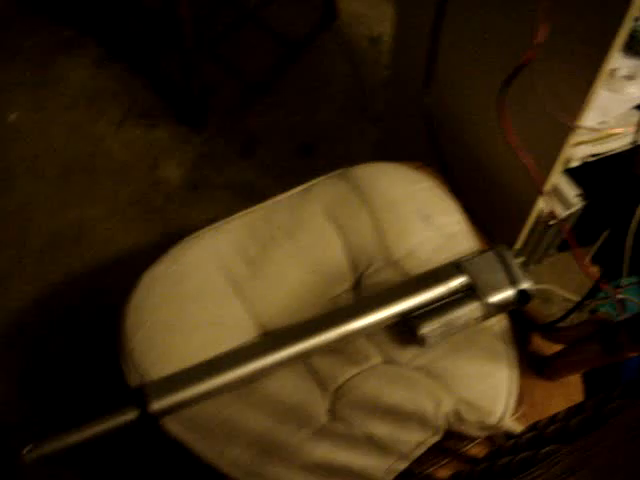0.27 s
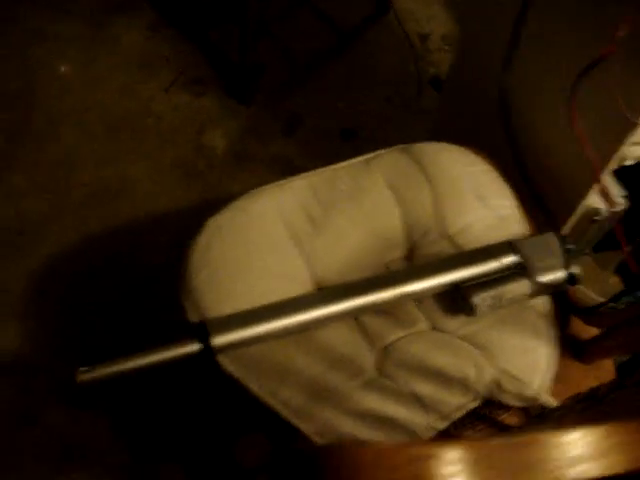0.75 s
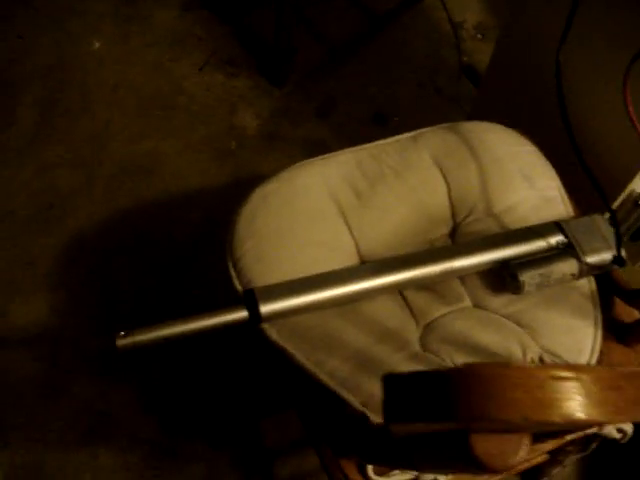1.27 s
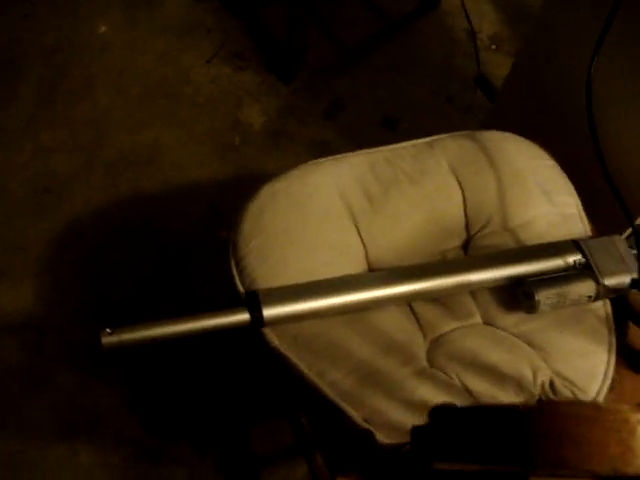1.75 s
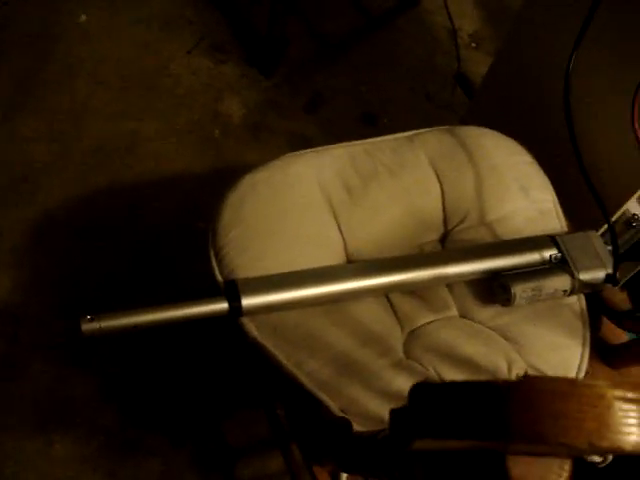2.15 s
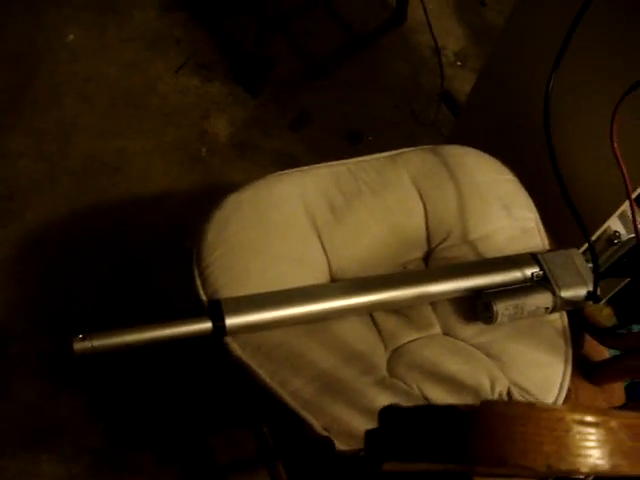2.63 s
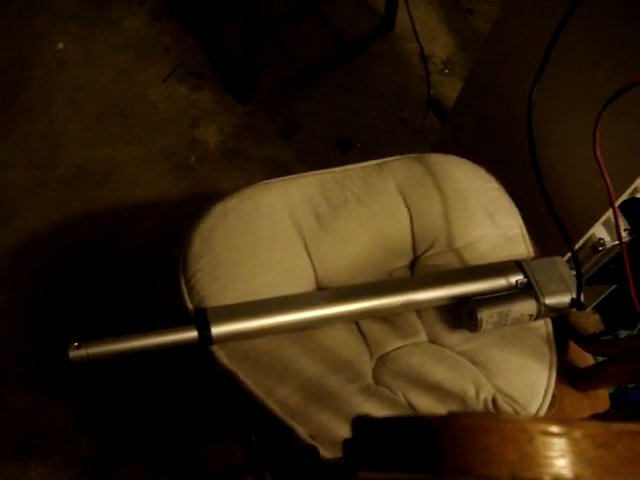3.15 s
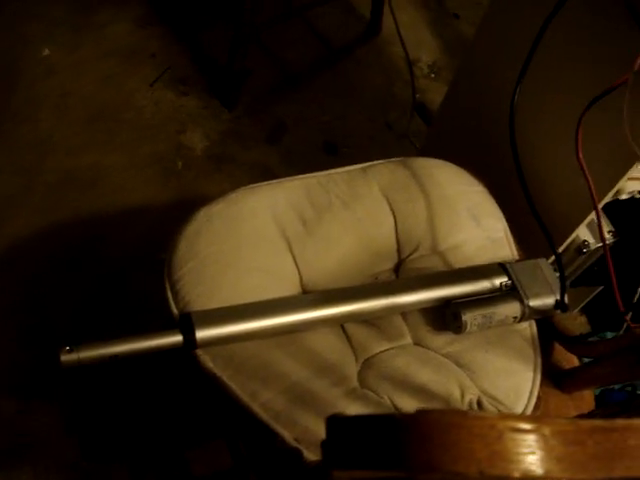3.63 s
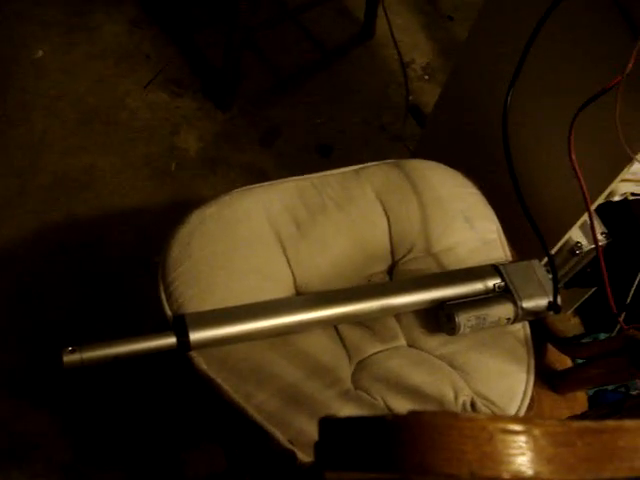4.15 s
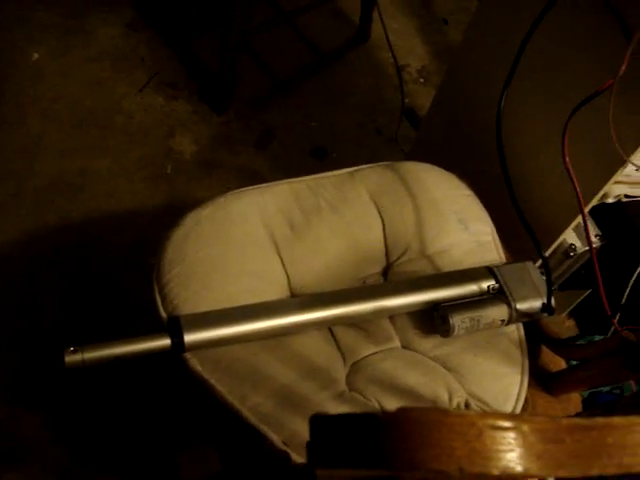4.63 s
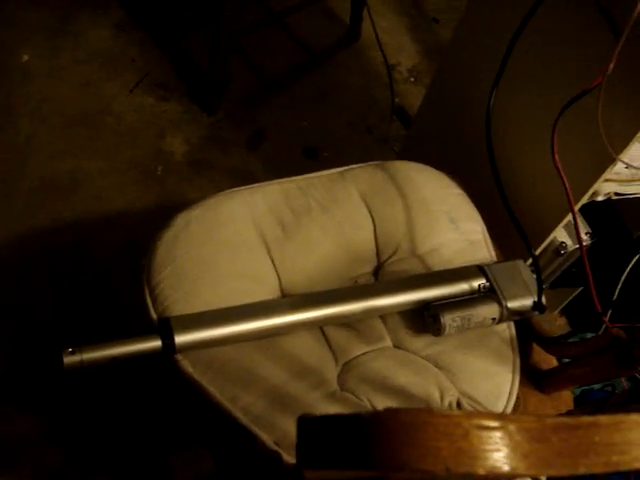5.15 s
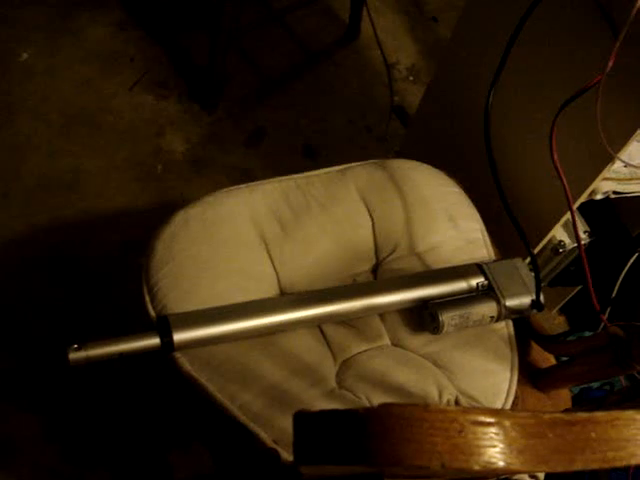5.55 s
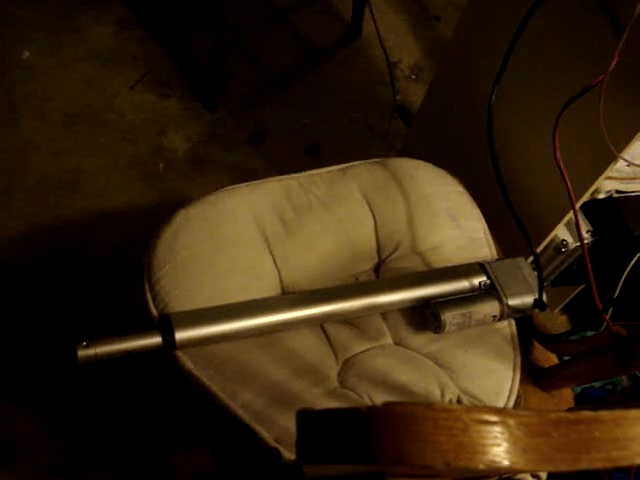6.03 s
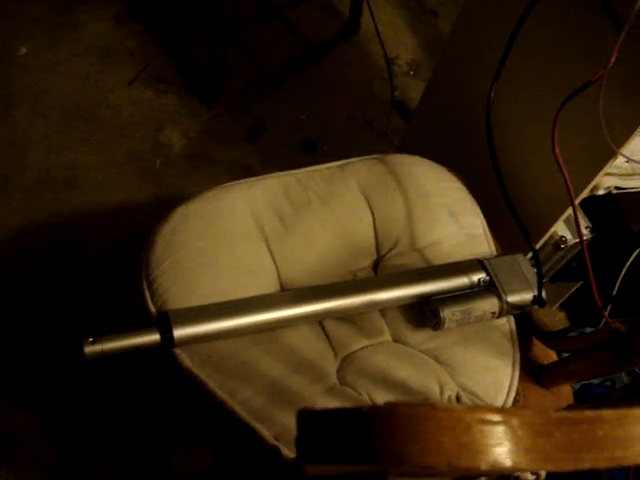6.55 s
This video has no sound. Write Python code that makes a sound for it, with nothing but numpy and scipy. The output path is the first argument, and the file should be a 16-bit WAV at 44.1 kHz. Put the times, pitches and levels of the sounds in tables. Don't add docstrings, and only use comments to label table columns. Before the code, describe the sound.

A small electric motor drives a metal linear actuator lying on a cushion in a quiet indoor room. Its raspy, whining whir is already running, shifting in tone as the handheld microphone swings toward it. At about two seconds a sharp double click interrupts it for an instant; the whir resumes rougher and slightly faster, then holds steady. Faint ticks come near the end.

```python
import sys
import numpy as np
from scipy import signal
from scipy.fft import rfft, irfft, next_fast_len
from scipy.io import wavfile
from scipy.ndimage import uniform_filter1d, map_coordinates

SR = 44100
rng = np.random.default_rng(int(sys.argv[2]) if len(sys.argv) > 2 else 0)


def wav_out(sig):
    wavfile.write(sys.argv[1], SR, np.round(np.clip(np.atleast_2d(sig).T, -1, 1) * 32767).astype(np.int16))


def field_ratio(decibels):
    return 10 ** (np.asarray(decibels, dtype=float) / 20)


N = 299468

GEAR_RATIO = 5
WHEEL_POINTS = 5 * 2048
CHANGE_S = 1.957
TURN_S, TURN_LENGTH_S = 0.4, 0.1
SEAT_S, OPEN_S = 0.54, 0.012
BRAKE_S, BRAKE_LENGTH_S, BRAKE_DB = 1.99, 0.017, -11.5

# (time [s], speed [turns/s])
SHAFT_SPEED = [(0, 50.115), (.6, 50.11), (1.35, 50.16), (1.7, 50.125), (1.93, 50.11), (1.99, 49.705),
               (2.07, 50.475), (2.12, 50.56), (2.35, 50.635), (2.5, 50.655), (3.6, 50.65), (4.1, 50.675),
               (5.7, 50.675), (6.2, 50.655), (6.79, 50.65)]
# (multiple of shaft speed, level [dB rms])
ORDERS_BEFORE = [(16.0, -64.3), (24.0, -59.3), (30.0, -64.7), (33.0, -64.1), (34.0, -59.3), (36.0, -57.9),
                 (37.0, -60.2), (48.0, -47.4), (50.0, -62.0), (51.0, -61.4), (52.0, -61.7), (54.0, -58.4),
                 (55.0, -58.6), (59.6, -58.5), (60.0, -48.4), (62.4, -61.2), (69.0, -62.6), (72.0, -63.6),
                 (78.0, -62.7), (94.0, -59.1), (97.0, -59.3), (98.0, -59.4), (100.0, -59.3), (112.0, -53.6),
                 (113.0, -52.9), (120.0, -60.4), (168.0, -62.1)]
ORDERS_AFTER = [(12.0, -57.4), (13.2, -61.0), (16.0, -62.0), (24.0, -60.6), (27.0, -62.7), (32.0, -57.7),
                (32.8, -63.8), (35.0, -61.8), (36.0, -54.9), (37.2, -65.1), (38.0, -66.1), (42.0, -67.0),
                (45.8, -67.3), (46.0, -63.5), (48.0, -53.7), (49.0, -63.9), (52.0, -59.1), (52.2, -62.3),
                (54.0, -57.6), (55.0, -59.0), (56.0, -57.5), (59.0, -61.0), (64.0, -63.9), (67.0, -61.4),
                (72.0, -55.3), (84.0, -63.7), (89.2, -61.5), (96.0, -57.6), (109.0, -62.7), (112.0, -58.3),
                (11.8, -68), (12.8, -67), (13.0, -66.5), (13.6, -69)]
# (frequency [Hz], density [dB per Hz])
RUB_BEFORE = [(180, -52), (300, -16), (801, -11.5), (1120, -13), (1190, -16.5), (1300, -13), (1820, -9.5),
              (2170, -15.5), (2340, -10.5), (2550, -8.5), (3000, -4.5), (3680, -11), (5470, -3),
              (6820, -10.5), (9980, -8.5), (13000, -47), (22000, -120)]
RUB_AFTER = [(180, -49), (300, -11.5), (539, -8.5), (606, -3), (734, -8), (1120, -8.5), (1190, -9.5),
             (1820, -3.5), (2200, -8.5), (2750, -0.5), (3180, -0.5), (3520, -3.5), (3960, -3.5),
             (5630, -3.5), (9980, -8), (13000, -47), (22000, -120)]
# (frequency [Hz], width [Hz], gain [dB])
HOUSING_BEFORE = [(1910, 130, 2.5), (2600, 200, 2), (2910, 150, 5.5), (5730, 180, 4.5), (7430, 340, 5),
                  (8860, 510, 4)]
HOUSING_AFTER = [(662, 96, 5), (1550, 300, 2.5), (2360, 120, -11), (2680, 160, 3.5), (2880, 140, 3),
                 (3195, 180, -5.5), (3970, 220, -2.5), (3450, 69, 3.5), (4740, 570, 4), (5580, 530, 5.5),
                 (6280, 300, 2.5), (6700, 200, 0.5), (7330, 550, 8), (8100, 330, -3.5), (8300, 470, 4.5),
                 (9370, 1200, 6.5)]
# (frequency [Hz], each shaft turn [dB], each wheel turn [dB])
REPEAT_BEFORE = [(500, -6, -10), (2500, -5, -4), (5000, -12, -6.5), (7000, -18, -4), (10000, -12.5, -5)]
REPEAT_AFTER = [(500, -3, -2), (1500, 0, 2), (3500, -1, 2), (4500, -3, 0), (5500, -8, -5), (6500, -12, -10),
                (10000, -13, -13)]
MESH_ORDERS = (12, 13, 36, 48, 60, 96, 97, 112, 113)
# (before click [dB rms], seated [dB rms], extra while seating [dB], seating time [s])
MESH_LEVELS = [(-65.5, -58, 0, .12), (-73, -66.5, -17, 1.8), (-55, -56, 3.5, 1.8), (-52, -55.5, 5.5, 1.5),
               (-50.8, -68.5, -8, 1.2), (-65, -56.5, -17, 0.35), (-67, -73, -3, .3), (-61, -54.5, -14, 0.2),
               (-68, -65.5, 1, .3)]
# (time [s], length [s], gain [dB])
MESH_BEAMS = [
    [(0.21, 0.15, -2.5)],
    [],
    [(0.5, 0.059, 0), (.8, .22, -8.5)],
    [(.0, 0.043, 5.5), (1.18, 0.28, 7.5), (2.5, 0.12, 1)],
    [(.1, 0.17, 3.5), (.52, 0.15, 6), (1.4, 0.13, 2.5)],
    [],
    [(0.45, 0.22, 11)],
    [(.78, .26, 13.5), (0.5, .06, 0.5)],
    [(.95, 0.61, 8)],
]
# (offset [shaft orders], level [dB])
RUNOUT_BUZZ = [(-2, -5), (-1, -6), (1, -12), (2, -8)]
SPLIT_HZ = [1600, 3380, 6750]
# (start [dB], gain on facing [dB], drift as camera backs off [dB/s])
FACING = [(-1, 1.7, -0.6), (-1.5, -.5, 1.35), (0.5, 4, -2.5), (-4, 7.5, -2)]
# (seated [dB], extra while seating [dB], change while contacts open [dB])
SEATING = [(0.03, -1.5, -2), (0.4, 1, -7), (1.94, -4, -5), (1.7, -4.5, -10)]
# (time [s], length [s], frequency [Hz], gain [dB])
SWING = [(0.074, .17, 1200, 6.5), (0.21, 0.21, 4700, -8), (0.22, 0.16, 8650, 7), (0.33, 0.27, 4200, 6),
         (0.43, 0.23, 2980, 4), (.8, 0.23, 5620, 2.5), (1.05, .1, 4800, 2.5), (1, 0.29, 6900, -5.5),
         (1.06, 0.23, 9200, -5), (2.6, 0.54, 690, -2.5), (2.6, .35, 1800, -2.5), (2.02, .08, 1000, 6),
         (.55, .3, 9800, 1.5), (1.1, .35, 3300, -2), (1.57, 0.11, 1700, 2), (.1, .15, 1430, 7),
         (2.056, 0.098, 5830, 4), (6.1, 0.7, 4300, 1.5)]
# (time [s], peak [dB], ring [Hz], t60 [s])
CLICKS = [
    (1.9557, -30, 4200, .006),
    (1.9560, -38, 950, .02),
    (1.9570, -30.5, 1420, .022),
    (1.9525, -39, 700, .02),
    (1.9600, -35, 1750, .012),
    (1.9716, -27.5, 1450, .012),
    (1.9735, -37, 640, .025),
    (1.9765, -42, 330, .04),
    (1.9732, -32, 1250, .015),
    (2.1072, -28.5, 3000, .003),
]
# (time [s], peak [dB], ring [Hz], t60 [s])
KNOCKS = [
    (.352, -46, 560, .04),
    (.365, -46.5, 244, 0.074),
    (0.376, -46, 420, .07),
    (1.056, -48, 318, 0.048),
    (1.065, -46, 440, 0.05),
    (5.992, -35.5, 3450, .03),
    (6.093, -43, 3450, .03),
    (6.19, -40, 3450, .03),
    (6.338, -38, 3450, .02),
    (6.246, -38, 4600, .02),
]
# (frequency [Hz], density [dB per Hz])
ROOM = [(12, -49), (20, -17), (65, -10.5), (92, 1), (111, -3.5), (128, -7.5), (187, -5), (296, -2.5),
        (372, -9), (449, -0.5), (500, -9.5), (650, -38), (1100, -120)]
# (start [s], end [s], lower edge [Hz])
DROPOUTS = [
    (1.958, 1.977, 9100),
    (4.64, 4.665, 9600),
    (4.707, 4.718, 9600),
]


def unit(x):
    return x / np.sqrt(np.mean(x ** 2) + 1e-20)


def along(points, hz, column=1):
    table = np.transpose(points)
    return np.interp(np.log(hz + 1), np.log(table[0] + 1), table[column])


def wobble(rate_hz):
    coarse = np.arange(0, N + 64, 64)
    knots = rng.standard_normal(int(N * rate_hz / SR) + 4)
    return np.interp(np.arange(N), coarse, map_coordinates(knots, [coarse * rate_hz / SR]))


def bump(t, at, length):
    return np.exp(-.5 * ((t - at) / length) ** 2)


def filtered(x, response):
    size = next_fast_len(N + SR // 2)
    return irfft(rfft(x, size) * response(np.fft.rfftfreq(size, 1 / SR)), size)[..., :N]


def actuator():
    t = np.arange(N) / SR
    since_s = np.maximum(t - CHANGE_S, 0)
    late = np.clip((t - CHANGE_S) / 0.0087, 0, 1)
    turns = np.cumsum(np.interp(t, *np.transpose(SHAFT_SPEED))) / SR
    before = stroke(turns, ORDERS_BEFORE, RUB_BEFORE, HOUSING_BEFORE, REPEAT_BEFORE,
                    rub_db=-40.0, drift=0.51, sway_db=2)
    after = stroke(turns, ORDERS_AFTER, RUB_AFTER, HOUSING_AFTER, REPEAT_AFTER,
                   rub_db=-45.0, drift=.22, sway_db=1.5)
    facing = (1 + np.tanh((t - TURN_S) / (2 * TURN_LENGTH_S))) / 2
    early_db = [start + gain * facing + slope * np.minimum(t, 2) for start, gain, slope in FACING]
    seating, opening = np.exp(-since_s / SEAT_S), np.exp(-(since_s / OPEN_S) ** 2)
    late_db = [seated + extra * seating + lost * opening for seated, extra, lost in SEATING]
    sound = (1 - late) * heard_from_camera(before, early_db, turns, beat=[.24, .3, .12])
    sound += late * heard_from_camera(after, late_db, turns, beat=[.1, .08, .15])
    return reflections(sound) + mesh_tones(turns, t, late)


def stroke(turns, orders, rub, housing, repeat, rub_db, drift, sway_db):
    def colour(hz):
        rings_db = sum(db / (1 + (2 * (hz - centre) / width) ** 2) for centre, width, db in housing)
        return field_ratio(along(rub, hz) + rings_db)

    hiss = filtered(rng.standard_normal(N), colour)
    fifths = np.round(np.transpose(orders)[0] * GEAR_RATIO) / GEAR_RATIO
    taken = np.concatenate([fifths, MESH_ORDERS, [60 + k for k, _ in RUNOUT_BUZZ]])
    repeating = 0
    for column, count in ((1, 1), (2, GEAR_RATIO)):
        worn = worn_pattern(turns, count, drift, taken)
        repeating += filtered(worn, lambda hz: colour(hz) * field_ratio(along(repeat, hz, column)))
    repeating /= np.sqrt(SR / 2 / 10600)
    tones = 0
    for order, (_, db) in zip(fifths, orders):
        if order not in MESH_ORDERS:
            partial = field_ratio(db + sway_db * wobble(2.5)) * tone(turns, order, flutter_rad=.15)
            if order == 13.2:
                partial *= screw_beat(turns, depth=0.31, angle_turns=0.56)
            tones += partial
    rubbing = np.array([field_ratio(-0.18) * hiss, field_ratio(1.07) * repeating])
    return field_ratio(rub_db) / np.std(hiss) * rubbing, tones


def worn_pattern(turns, count, drift, orders):
    size = WHEEL_POINTS * count // GEAR_RATIO
    lines = rfft(rng.standard_normal((2, size)))
    lines /= (abs(lines) + 1e-9) ** (.5 / count)
    lines[:, 210 * count:] = 0
    own = orders[orders * count % 1 < 1e-6]
    lines[:, np.round(own * count).astype(int)] = 0
    place = [turns / count % 1 * size]
    one, other = (unit(map_coordinates(p, place, order=1, mode="grid-wrap")) for p in irfft(lines, size))
    blend = drift * wobble(1.512)
    return np.cos(blend) * one + np.sin(blend) * other


def tone(turns, order, flutter_rad, sidebands=()):
    phase = 2 * np.pi * (order * turns + rng.random()) + flutter_rad * wobble(9.1)
    wave = np.sin(phase)
    for k, db in sidebands:
        sign = -1 if k == 1 else 1
        wave += sign * field_ratio(db) * np.sin(phase + 2 * np.pi * k * turns)
    return np.sqrt(2) * wave


def screw_beat(turns, depth, angle_turns):
    return 1 + depth * np.cos(2 * np.pi * (turns / 10 - angle_turns))


def mesh_tones(turns, t, late):
    since_s = np.maximum(t - CHANGE_S, 0)
    tones = []
    for order, levels, beams in zip(MESH_ORDERS, MESH_LEVELS, MESH_BEAMS):
        before_db, seated_db, extra_db, seat_s = levels
        db = (1 - late) * before_db + late * (seated_db + extra_db * np.exp(-since_s / seat_s))
        db += sum(beam_db * bump(t, s, length) for s, length, beam_db in beams)
        db += BRAKE_DB * bump(t, BRAKE_S, BRAKE_LENGTH_S)
        sidebands = RUNOUT_BUZZ if order == 60 else ()
        tones.append(field_ratio(db + .8 + .7 * wobble(6)) * tone(turns, order, .002 * order, sidebands))
    tones[0] *= screw_beat(turns, depth=0.17, angle_turns=0.48)
    return sum(tones)


def heard_from_camera(layers, part_db, turns, beat):
    (hiss, repeating), tones = layers
    pair = np.array([hiss, repeating + tones])
    lows = [filtered(pair, lambda hz: 1 / (1 + (hz / split) ** 16)) for split in SPLIT_HZ]
    edges = [0, *lows, pair]
    shared = field_ratio(.45 * wobble(70))
    out = 0
    for k, db in enumerate(part_db):
        steady, periodic = edges[k + 1] - edges[k]
        gain = field_ratio(db + .5 * wobble(5.7)) * (shared if k else 1)
        out += gain * (steady * throb(turns, beat) + periodic)
    return out


def throb(turns, beat):
    angle = 2 * np.pi * (np.outer([1, 2, 2 / GEAR_RATIO], turns) + rng.random((3, 1)))
    return (1 + np.dot(beat, np.cos(angle))) * field_ratio(0.39 * wobble(25))


def reflections(x):
    hz, t, z = signal.stft(x, SR, nperseg=512)
    field_db = 0
    for s, length, centre, db in SWING:
        field_db += db * np.outer(bump(hz, centre, 0.052 * centre), bump(t, s, length))
    return signal.istft(z * field_ratio(field_db), SR, nperseg=512)[1][:N]


def clicks():
    out, t = np.zeros(N + SR), np.arange(SR // 10) / SR
    for s, db, hz, t60 in [*KNOCKS, *CLICKS]:
        onset = 1 - np.exp(-t * hz * 4)
        ring = np.sin(2 * np.pi * hz * t) * field_ratio(-60 * t / t60) * onset
        out[round(s * SR):][:len(t)] += field_ratio(db + 0.5) * ring
    return out[:N]


def room():
    rumble = filtered(rng.standard_normal(N), lambda hz: field_ratio(along(ROOM, hz)))
    fall_db = 0.33 * np.arange(N) / SR
    return field_ratio(-59.5 - fall_db + .4 * wobble(2.93)) * unit(rumble)


def scene():
    return np.tile(actuator() + clicks() + room(), (2, 1))


def treble_dropouts(x, share):
    edges_hz = np.arange(5000, 10200, 520)
    t, block = np.arange(N) / SR, np.arange(N) // 256
    need = uniform_filter1d(rng.standard_normal((len(edges_hz), block[-1] + 1)), size=2, axis=1)
    empty = need[:, block] < np.quantile(need, share)
    for start, end, above_hz in DROPOUTS:
        empty |= np.outer(edges_hz > above_hz, (t > start) & (t < end))
    bands = filtered(x[0], lambda hz: (hz - edges_hz[:, None]) // 520 == 0)
    return x - np.sum(uniform_filter1d(1. * empty, size=96, axis=1) * bands, axis=0)


def top_cut(x):
    return signal.sosfilt(signal.butter(12, 10130, fs=SR, output="sos"), x)


def record(dry):
    thinned = treble_dropouts(dry, share=.068)
    limited = filtered(thinned, lambda hz: np.clip((10140 - hz) / 200, 0, 1))
    return top_cut(limited)


dry = scene()
out = record(dry)
wav_out(out)
```